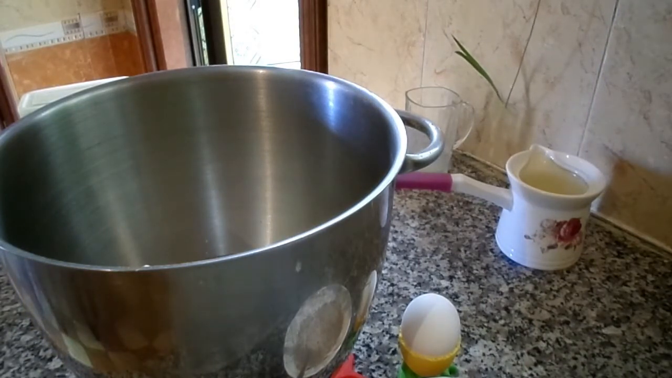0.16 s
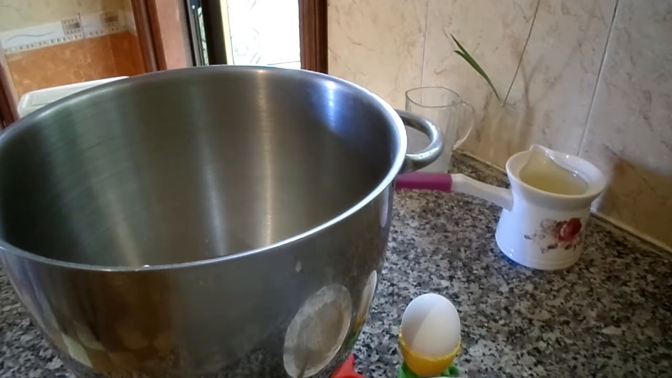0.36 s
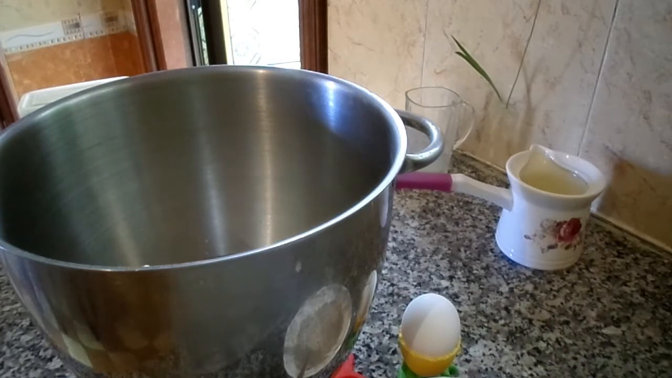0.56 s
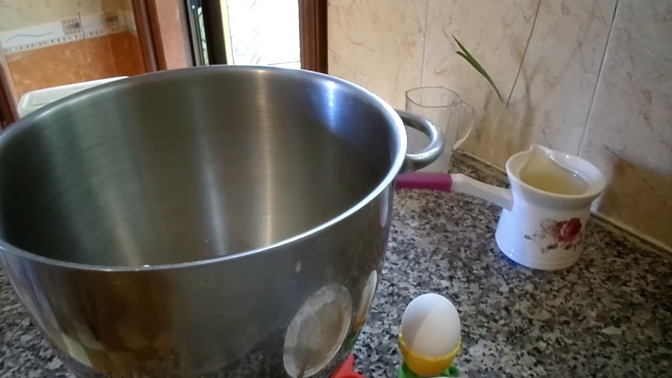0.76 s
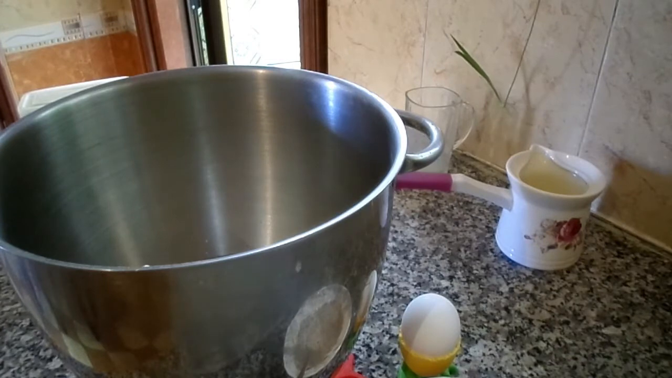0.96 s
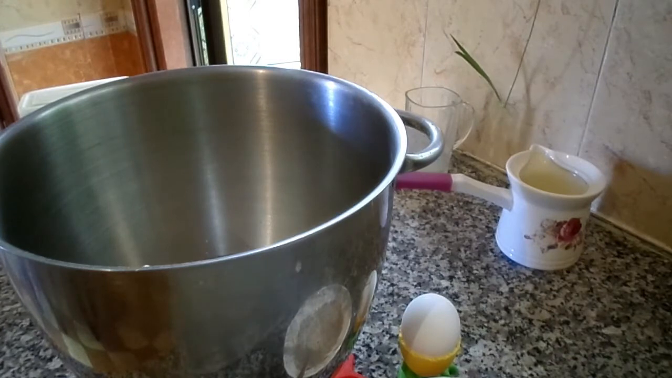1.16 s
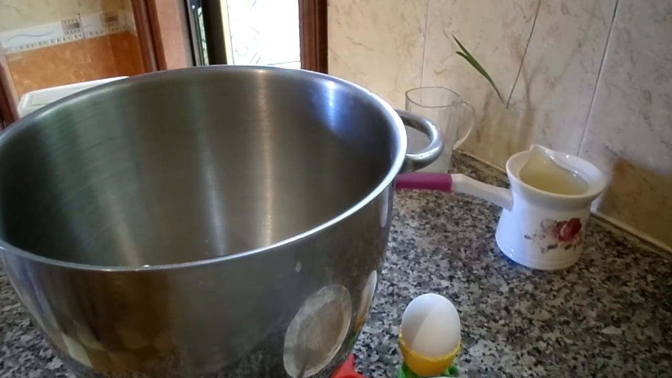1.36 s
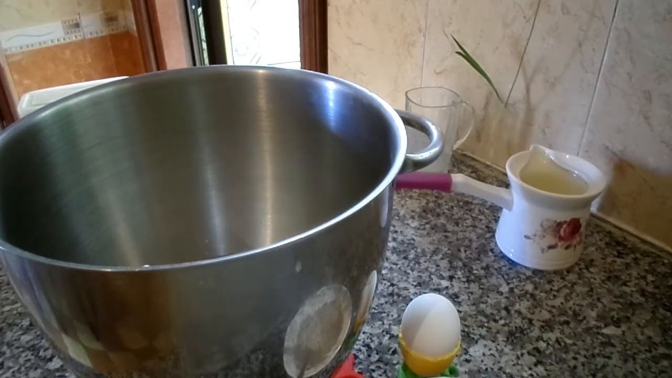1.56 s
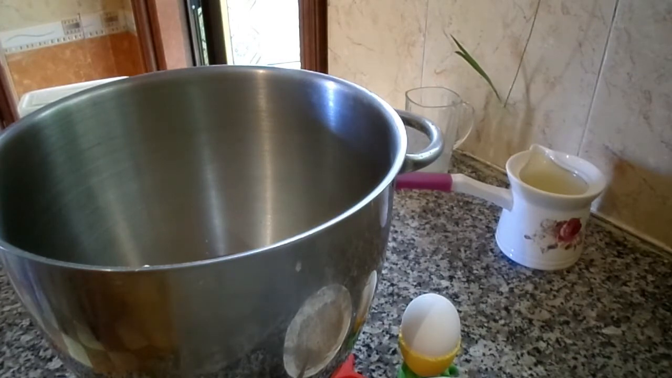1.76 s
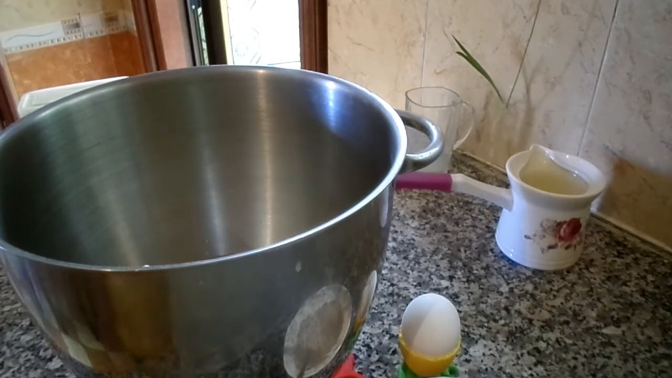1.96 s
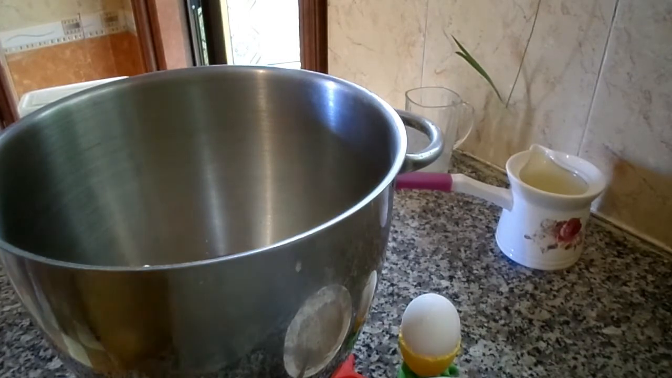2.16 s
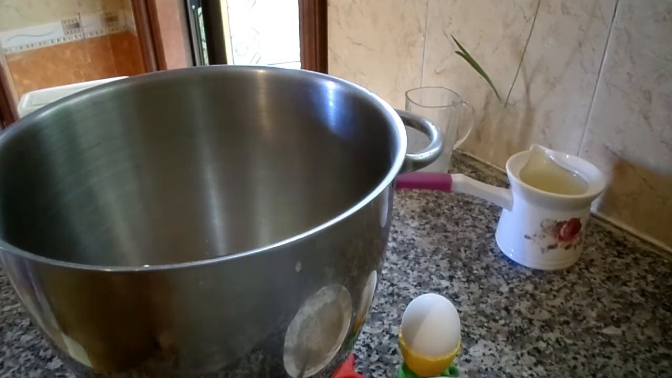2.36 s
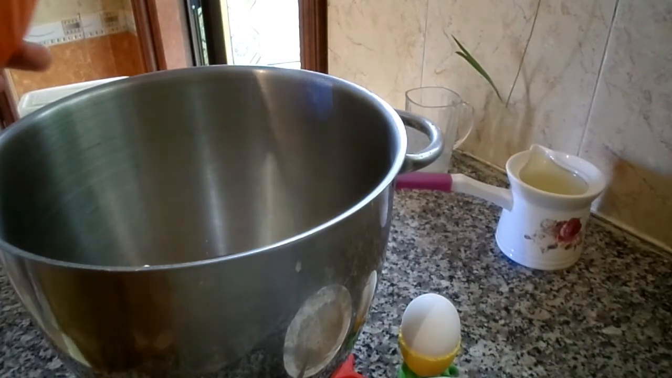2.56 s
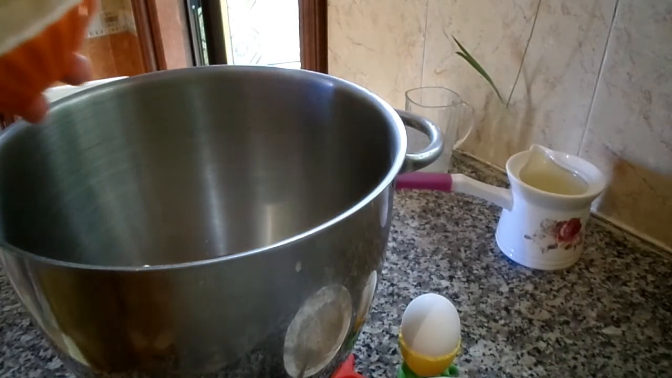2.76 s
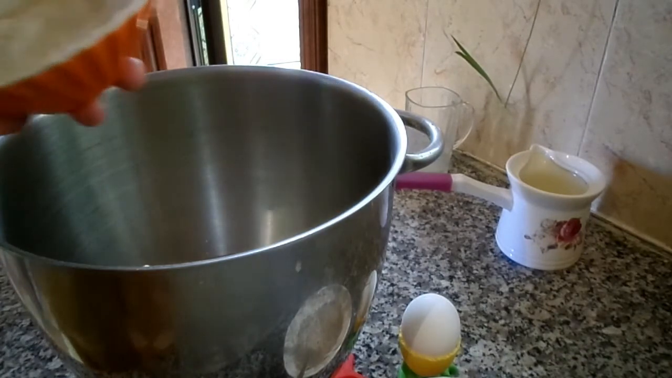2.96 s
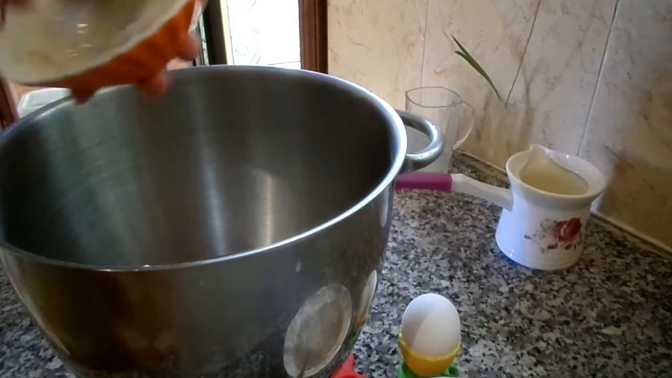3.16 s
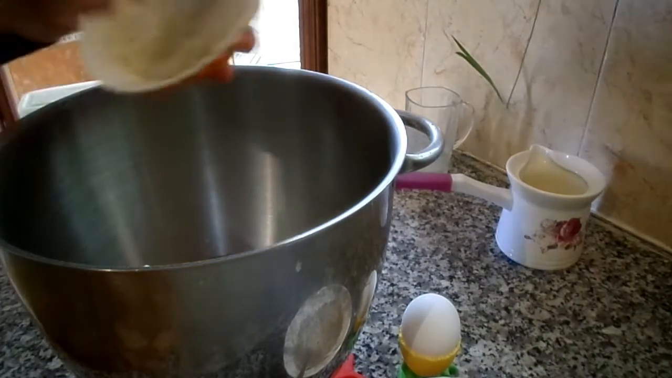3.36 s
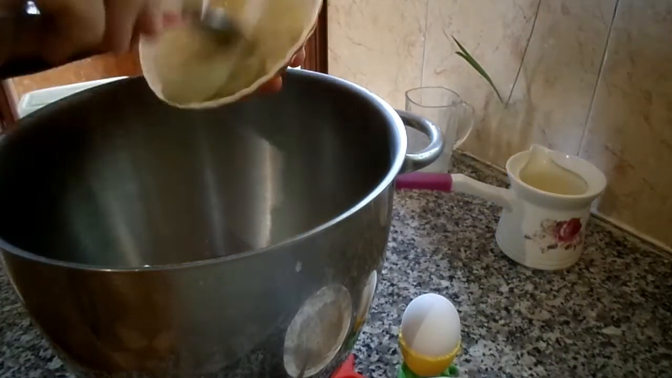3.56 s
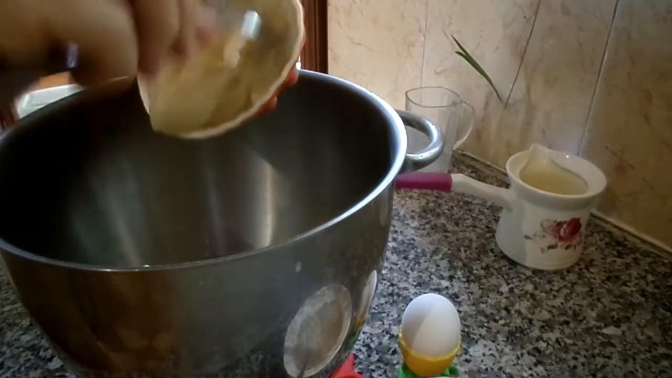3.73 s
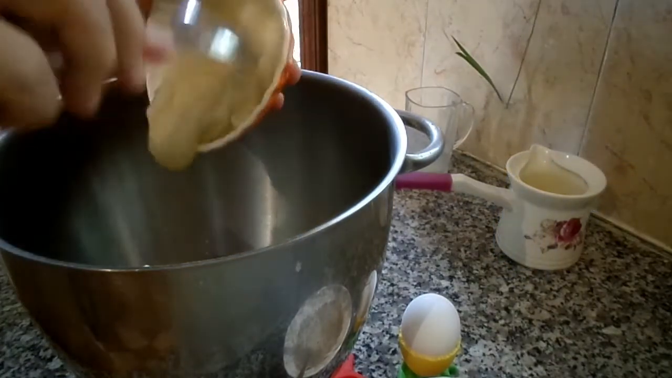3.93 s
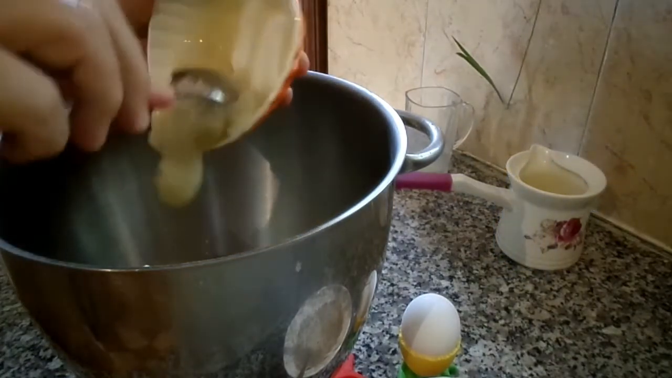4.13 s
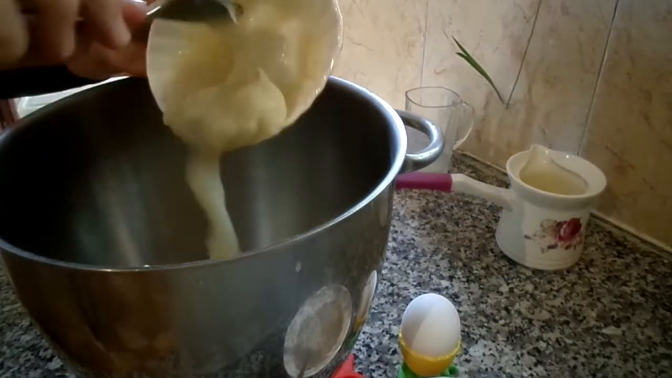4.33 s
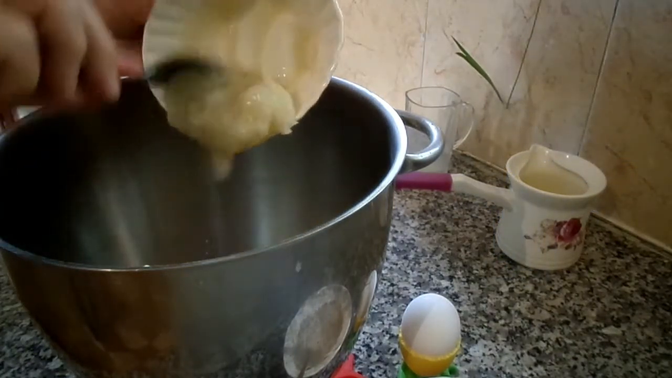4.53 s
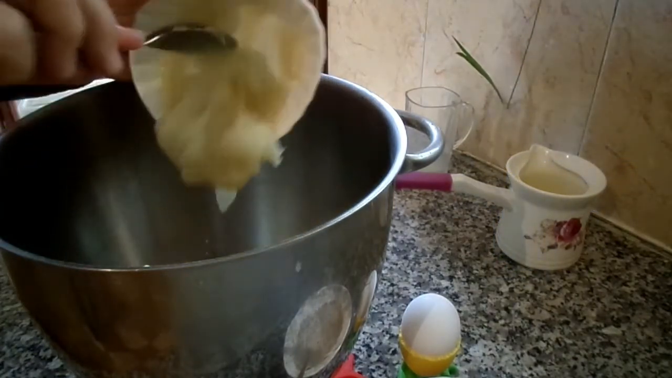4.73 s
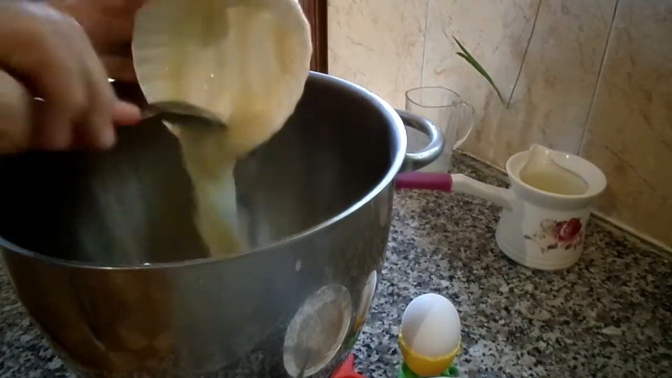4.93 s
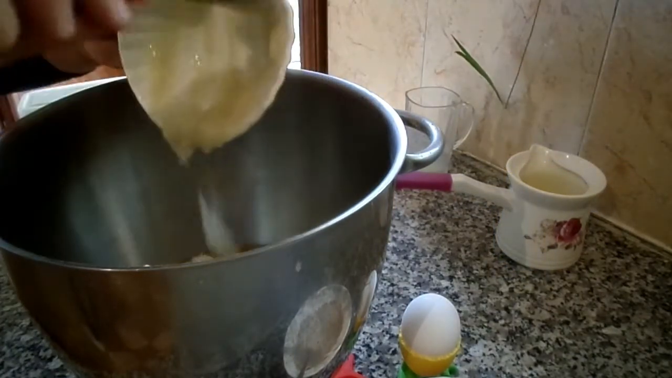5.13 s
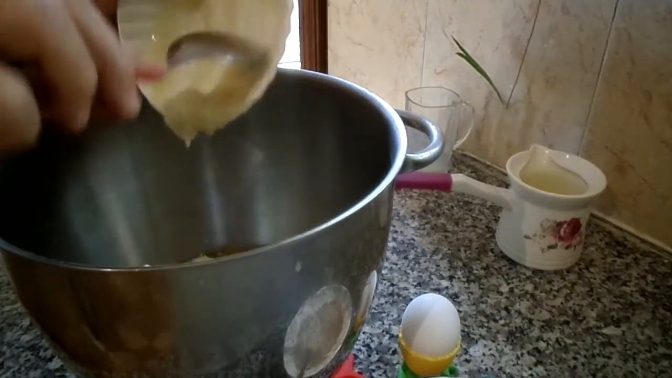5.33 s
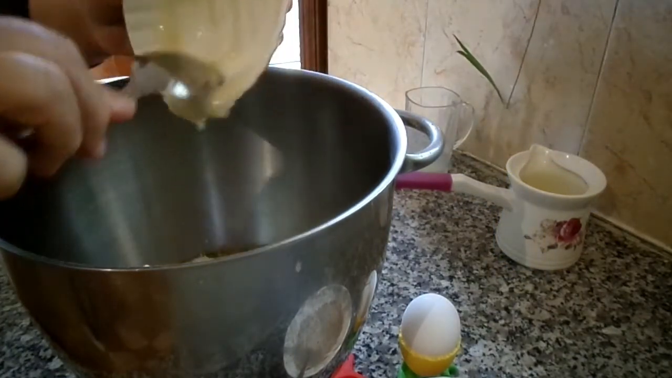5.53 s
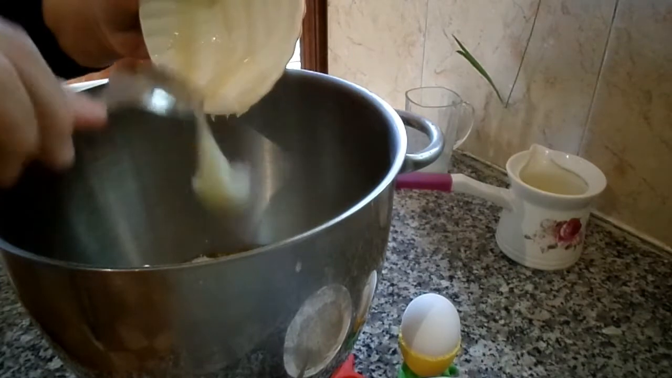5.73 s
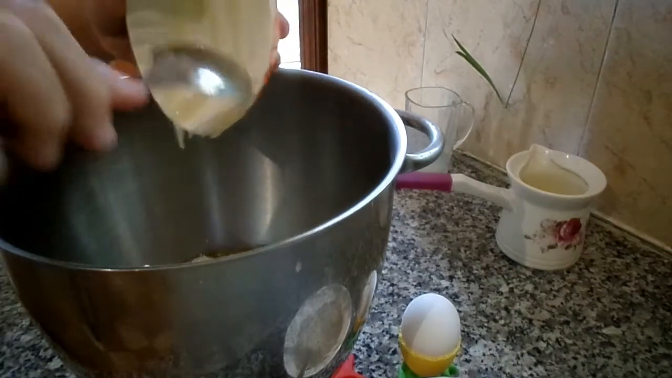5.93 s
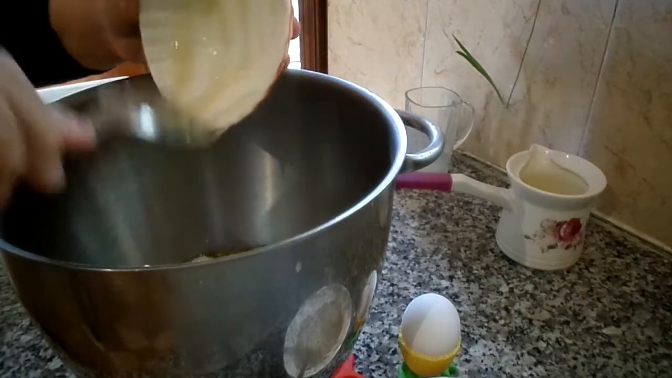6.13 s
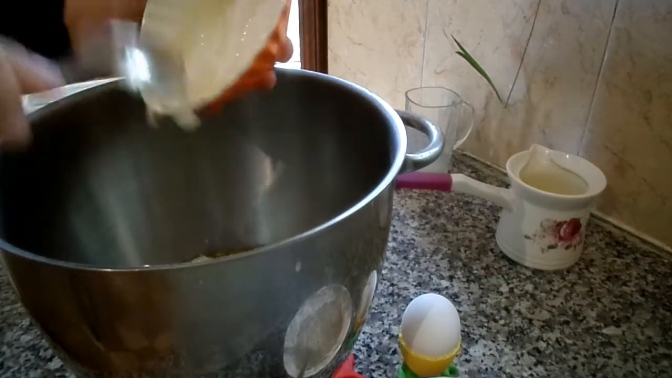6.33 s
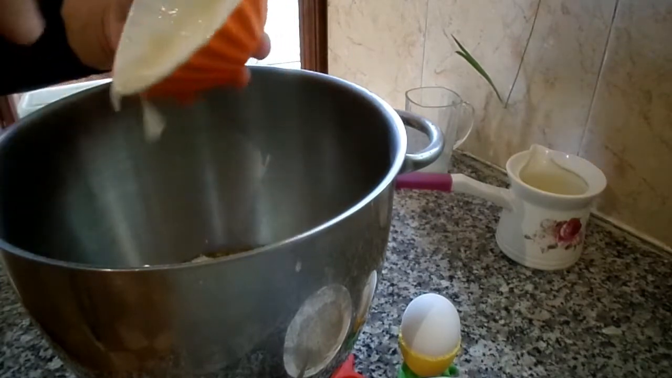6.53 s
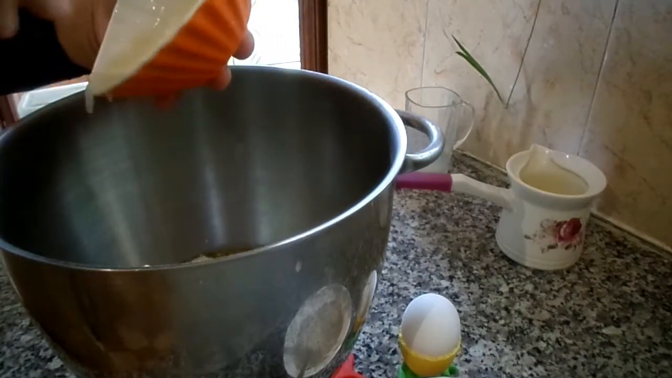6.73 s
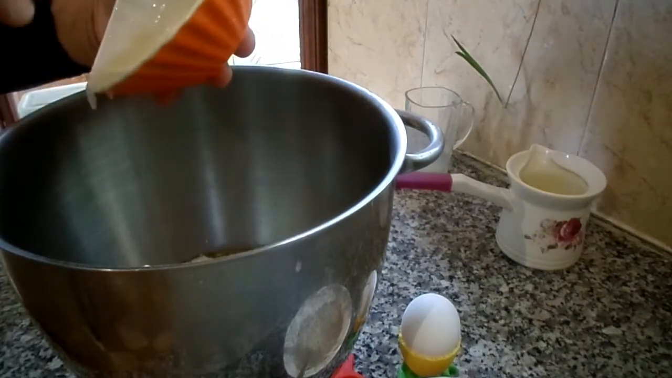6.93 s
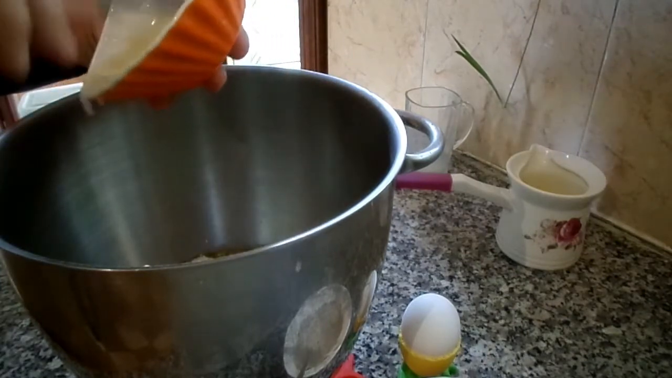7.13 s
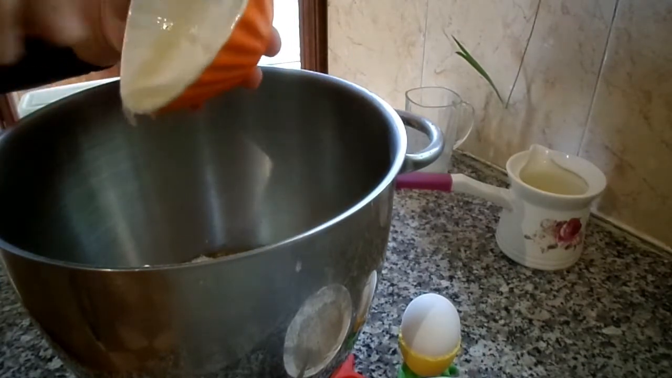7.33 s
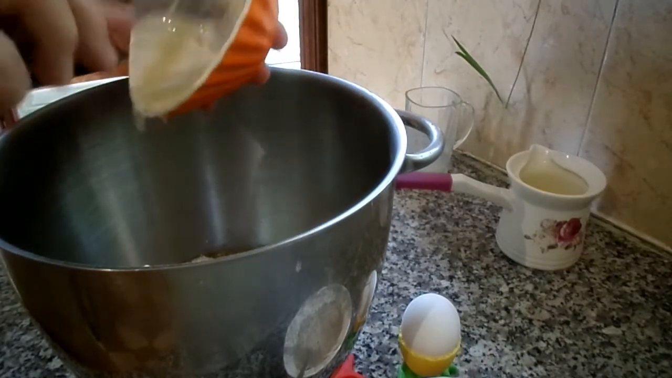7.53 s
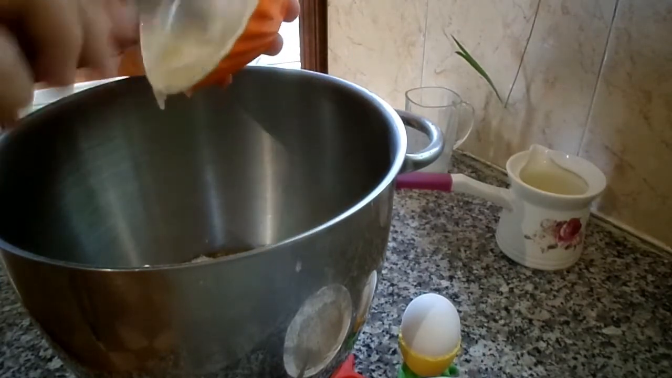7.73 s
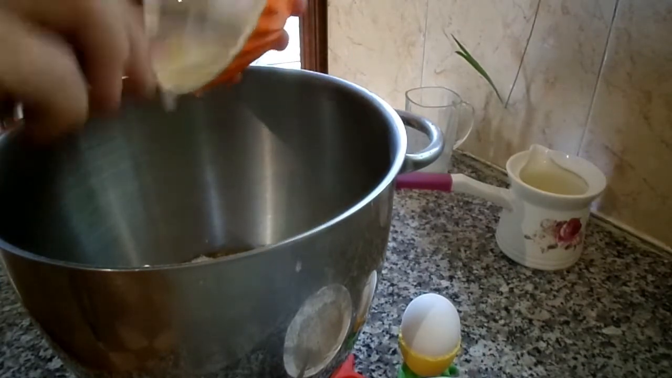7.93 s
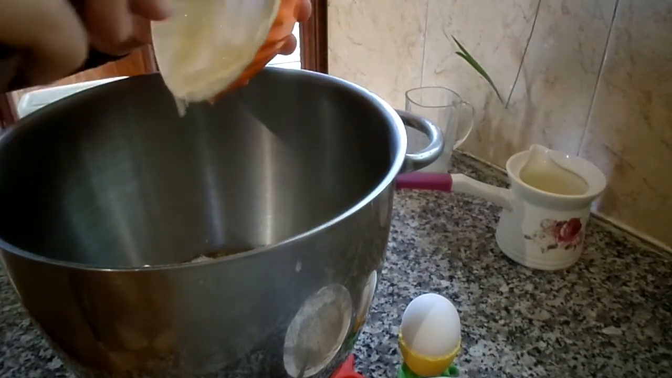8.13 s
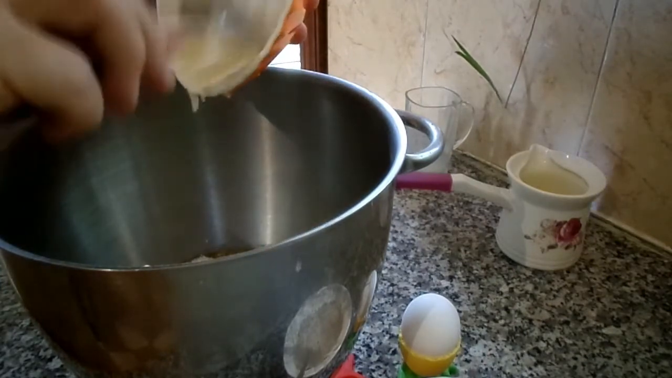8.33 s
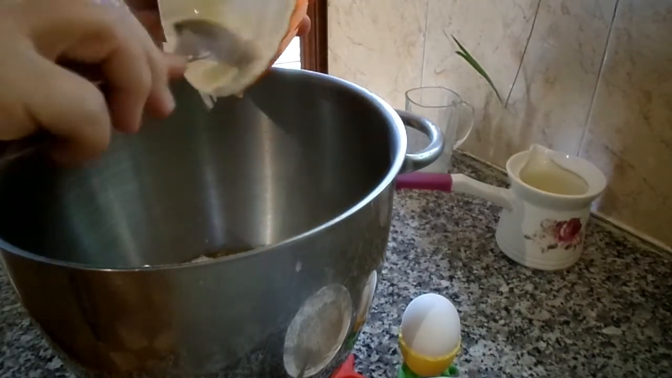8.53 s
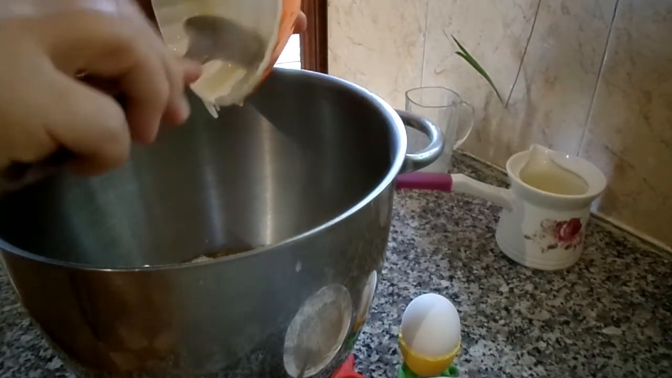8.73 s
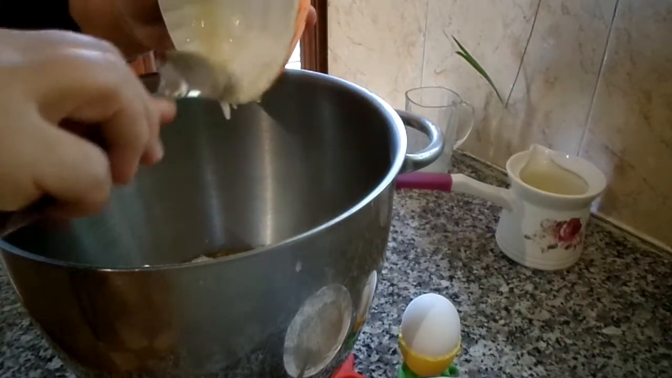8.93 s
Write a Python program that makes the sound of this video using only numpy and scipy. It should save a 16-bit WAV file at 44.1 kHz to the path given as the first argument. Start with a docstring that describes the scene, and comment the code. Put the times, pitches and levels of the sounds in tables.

```python
"""A steel spoon taps and scrapes a small ceramic bowl held over a steel pot in a tiled kitchen.
Each blow is a noise crack, a thud and decaying modes of the hand-damped bowl; drags are filtered random slips.
Noise-fed metal modes make cutlery jingle at the start; dull knocks and hand brushes are shaped noise.
A fridge hums in sines over noise rumble and hiss; this background is lower during most of the clatter.
A decaying noise tail gives the room."""
import sys
import numpy as np
from scipy import signal
from scipy.fft import rfft, irfft
from scipy.io import wavfile
from scipy.ndimage import uniform_filter1d

SR = 44100
rng = np.random.default_rng(int(sys.argv[2]) if len(sys.argv) > 2 else 0)


def file_out(sig):
    """Save sig as 16-bit WAV at sys.argv[1]."""
    # one column per channel
    cols = np.atleast_2d(sig).T
    # limit, then scale
    lim = np.clip(cols, -1, 1)
    pcm = np.round(lim * 32767).astype(np.int16)
    wavfile.write(sys.argv[1], SR, pcm)


N = 400407
TIME_S = np.arange(N) / SR


def undb(db):
    """Amplitude ratio from dB."""
    return 10 ** (np.asarray(db) / 20)


def unit(x):
    """Scales to RMS 1."""
    return x / np.sqrt(np.mean(x ** 2))


def noise(n=N):
    """White Gaussian noise."""
    return rng.standard_normal(n)


def colour(x, points):
    """Shapes a spectrum by (frequency [Hz], gain [dB]) points, linear over log frequency."""
    hz, db = np.transpose(points)
    bin_hz = np.maximum(np.arange(len(x) // 2 + 1) * SR / len(x), 1)
    gain = undb(np.interp(np.log(bin_hz), np.log(hz), db))
    return irfft(rfft(x) * gain, len(x))


def band(x, hz, width_hz):
    """One resonant band."""
    return signal.lfilter(*signal.iirpeak(hz, hz / width_hz, fs=SR), x)


def curve_db(points, **ends):
    """Level [dB] over time, linear between (time [s], level [dB]) points."""
    return np.interp(TIME_S, *np.transpose(points), **ends)


def walk(rate_hz):
    """Random levels joined by straight ramps, one per 1 / rate_hz; spread near 1."""
    step = int(SR / rate_hz)
    held = np.repeat(rng.standard_normal(N // step + 1), step)
    return 1.37 * uniform_filter1d(held, step)[:N]


def fade(t_s, t60_s):
    """Exponential decay, 60 dB in t60_s."""
    return np.exp(-np.log(1000) * t_s / t60_s)


def add(out, start_s, x):
    """Mixes x into out at start_s, cut at the end."""
    i = int(start_s * SR)
    out[i:i + len(x)] += x[:N - i]


def ring(x, hz, t60_s):
    """One decaying mode driven by x: a two-pole resonator."""
    radius, angle = fade(1 / SR, t60_s), 2 * np.pi * hz / SR
    return signal.lfilter([np.sin(angle)], [1, -2 * radius * np.cos(angle), radius * radius], x)


def strokes(rows):
    """Gain of strokes that swell to a peak, then fade at a steady dB rate."""
    out, t = np.zeros(N), TIME_S[:SR // 2]
    swell_depth_db = 15.5  # start of a stroke below its peak
    for start_s, swell_s, peak_db, fade_db_per_s in rows:
        rise_db = swell_depth_db * (1 - t / swell_s)
        fall_db = fade_db_per_s * (t - swell_s)
        add(out, start_s, undb(peak_db - np.maximum(rise_db, fall_db)))
    return out


# level curve of the colliding cutlery: (time [s], level [dB])
JINGLE_LEVEL = [(0, -23), (.006, -27.5), (.026, -28), (.031, -27), (.058, -26), (.08, -30), (.14, -40)]
# cutlery modes: (frequency [Hz], relative level [dB], nominal t60 [s])
CUTLERY_MODES = [(2996, -19.5, .25), (3950, -21, .2), (5280, -19, 0.56), (5470, -25, 0.44),
                 (6090, -16.5, 0.23), (6810, -13.5, 0.32), (7650, -18, 0.31), (8750, -15.5, .2),
                 (10190, -8.5, .4), (10200, -9, 0.3), (10900, -12, .3), (12040, -5, 0.65),
                 (12130, -0.5, 0.13), (12700, -8, 0.28), (13000, -2, 0.16), (13810, -12, .3),
                 (14400, -14, .15), (15110, -11, .16)]
# contact noise spectrum, also of blows and drags: (frequency [Hz], relative gain [dB])
CRACK_SPECTRUM = [(300, -41), (720, -17.5), (1800, -6.5), (4000, -2.5), (6800, -5), (9500, -2), (13000, 2),
                  (16000, -11)]


def jingle():
    """Flickering noise for quick small collisions feeds thin metal modes, each a close pair."""
    level = undb(curve_db(JINGLE_LEVEL, left=-200, right=-200))
    hits = (level * noise() * undb(1.4 * walk(300)))[:SR]
    rung = np.zeros(SR)
    for hz, db, t60_s in CUTLERY_MODES:
        for pair in (1, 1.006):
            rung += undb(db) * ring(hits, hz * pair, 0.57 * t60_s) / np.sqrt(t60_s * SR)
    return np.pad(undb(16.5) * rung + undb(-7.5) * colour(hits, CRACK_SPECTRUM), (0, N - SR))


# fridge hum partials: (frequency [Hz], mean relative level [dB])
HUM_PARTIALS = [(100, -2), (200, -21.5), (300, -13.5)]


def hum():
    """Mains hum of the fridge: sines with slightly wavering levels."""
    out = np.zeros(N)
    for hz, db in HUM_PARTIALS:
        out += undb(db + .5 * walk(11)) * np.sqrt(2) * np.sin(2 * np.pi * hz * TIME_S)
    return out


# low rumble before the background curve: (time [s], level [dB])
RUMBLE_LEVEL = [(0, 4.5), (.6, -9), (.9, -3), (1.5, -9), (1.75, 4), (2.2, 2), (3, -10.5), (4, -2.5),
                (9, -5)]


def rumble():
    """Noise through two low resonances, its level following a curve."""
    low = band(band(noise(), 39.4, 15.0), 42.3, 21.0)
    return undb(curve_db(RUMBLE_LEVEL)) * unit(low)


# hiss spectrum: (frequency [Hz], relative gain [dB])
HISS_SPECTRUM = [(15, -35), (25, 1), (60, -10), (130, -9), (270, -13), (1330, -13.5), (2100, -6.5),
                 (2550, -10.5), (3340, -5.5), (4300, -13.5), (5430, -17), (8300, -16.5), (10900, -11.5),
                 (13500, -16.5), (16000, -36)]


def hiss():
    """Coloured noise with a gently flickering level."""
    level_db = 11  # before the background curve
    return undb(level_db + 0.66 * walk(9)) * unit(colour(noise(), HISS_SPECTRUM))


# common background gain: (time [s], level [dB])
BACKGROUND_LEVEL = [(0, -49), (.6, -50.5), (2.83, -50), (2.93, -56), (3.61, -49.5), (3.72, -56.5),
                    (4.05, -58.5), (4.3, -58), (4.58, -61.5), (5.34, -65.5), (5.81, -57), (5.97, -73),
                    (6.09, -65), (6.24, -67.5), (6.98, -59), (7.51, -61.5), (8.14, -61), (9.05, -58)]


def background():
    """Hum, rumble and hiss rise and sink together on one gain curve."""
    return undb(curve_db(BACKGROUND_LEVEL)) * (hum() + rumble() + hiss())


# dull knocks away from the bowl: (time [s], level [dB], centre [Hz], width [Hz], t60 [s])
KNOCK_HITS = [(.324, -33.5, 1980, 3500., 0.28), (.335, -40, 350., 500., 0.41), (3.054, -39, 352, 161, 0.31),
              (3.06, -47, 860, 400., 0.24), (3.059, -46, 171, 80., 0.25), (3.385, -33, 2070, 500., 0.089),
              (3.405, -37.5, 1850., 400., 0.13)]


def knocks():
    """Decaying noise bursts, each in one broad resonance."""
    out, t = np.zeros(N), TIME_S[:SR // 4]
    for start_s, db, hz, width_hz, t60_s in KNOCK_HITS:
        burst = unit(band(noise(len(t)), hz, width_hz))
        add(out, start_s, undb(db) * fade(t, t60_s) * burst)
    return out


# a hand brushes over something: (start [s], swell [s], peak level [dB], fade [dB/s])
BRUSH_STROKES = [(.595, .022, -42, 170), (2.46, 0.12, -34.5, 110), (2.76, .045, -41, 600),
                 (3.325, .006, -40, 400), (3.39, .016, -36, 600), (3.42, .09, -36.5, 105)]
# friction spectrum: (frequency [Hz], relative gain [dB])
BRUSH_SPECTRUM = [(1000, -18), (3000, -16), (6000, -4.5), (9000, -3.5), (12500, 2.5), (16000, -16)]


def brush():
    """Bright friction noise in smoothed strokes, its level wavering."""
    level = uniform_filter1d(strokes(BRUSH_STROKES), 400) * undb(2.6 * walk(30.03))
    return level * unit(colour(noise(), BRUSH_SPECTRUM))


# blows: (time [s], level [dB], then relative levels of rim sway [dB], spoon bowl ring [dB],
# high ring [dB], top rings [dB])
BLOW_HITS = [(2.846, 8.5, -22, -28, -6, -10), (2.964, -25, -22, -17, -21, -9),
             (3.274, -7.5, -23, -37, -14, -0.5), (3.309, -16, -22, -11, -17, -18),
             (3.65, -3.5, -23, -37, -23, -1), (3.675, 2, -27.5, -19, -17, -9.5),
             (3.754, 7, -27.5, -24, -16, -30), (3.774, -5, -23, -34, -12, -19),
             (3.965, -15.5, -38, -36, -8, -6), (3.982, -19.5, -17, -21, -3, -2),
             (3.988, -6.5, -24.5, -39, -9.5, 0.5), (4.069, -27, -22, -31, -20, -5),
             (4.359, -2.5, -33, -25, -40, -14), (4.364, -1, -22.5, -11.5, -33, -9),
             (4.41, -14, -28, -24, -24, -13), (4.427, -7.5, -23.5, -39, -24, -24),
             (4.499, -31, -9, 4, -11, -9), (4.526, 1.5, -43, -29, -24, -20),
             (4.716, -1, -25.5, -20, -27, -19), (4.781, 1.5, -22.5, -14, -20, -23),
             (4.82, -15, -30, -23, -20, -19), (4.854, -19, -31, -24, -15, -20),
             (4.896, -30, -27, -21, -24, -15), (5.07, -5.5, -41, -30, -15, 1.5),
             (5.212, -14.5, -17, -7.5, -9.5, -22), (5.336, -21.5, -30, -3, -7, -17),
             (5.358, -2.5, -36, -10, -11, -15), (5.394, -7.5, -39, -28, -13.5, -19),
             (5.426, -10.5, -23, -9, -15, -20), (5.6, -25.5, -11, -24, -10.5, -27),
             (5.806, -12.5, -45, -20, -40, 1), (5.907, -5.5, -20.5, -47, -10, -9),
             (5.927, -8, -18, -26, -5, -21), (5.963, -3.5, -31, -41, -0.5, -24),
             (5.989, -4, -22, -43, -5, -16), (6.013, -1, -22.5, -41, -7, -5), (6.22, -3, -16, -40, -5, -14),
             (6.618, -13, -22, -37.5, -11.5, 0), (6.646, -13.5, -23.5, -37, -22, -6),
             (6.987, -8, -28, -44, -24, -1), (7.015, -8.5, -32, -18, -18, -16),
             (7.06, -7.5, -27, -18, -6, -20), (7.075, -11, -19, -9.5, -22, -17),
             (7.09, -8, -21.5, -8, -11, -17), (7.11, -9.5, -20.5, -9, -31, -21),
             (7.137, -14, -14.5, -20, -24, -23), (7.327, -7, -27.5, -31, -17, 1),
             (7.419, -7, -29, -27, -22, -4), (7.546, -16.5, -19, -4.5, -21, -16),
             (7.56, -1, -22, -9, -20, -27), (7.596, -4.5, -26, -24, -17, -24),
             (7.619, -13, -28, -23, -10, -22), (7.806, 0.5, -27, -27, -8.5, -7),
             (7.924, -30, -13, 2.5, -24, -17), (8.132, -8, -26.5, -22, -6.5, -2),
             (8.221, 1.5, -16.5, -13, -6.5, -9), (8.371, -5.5, -24.5, -17, -14.5, -1),
             (8.45, 0, -15.5, -7.5, -11.5, -36), (8.62, -11, -27, -21, -19, -1),
             (8.662, -8.5, -12, -34, -10, -14), (8.69, -25, -20, 5, -25, -23),
             (8.71, -22, -14, 6.5, -23, -23), (8.731, -29, -22, 1, -27, -25),
             (8.763, -30, -7, 3.5, -31, -24), (8.955, -3, -31.5, -27, -6.5, -17)]
# modes: (frequency [Hz], relative level [dB], nominal t60 [s], group [floor: 0 rim, 1 spoon bowl,
# 2 wall, 3 upper wall, 4 high, 5 top])
BOWL_MODES = [(2180, -7.5, 0.022, 0.33), (2415, 0, 0.029, 1), (2590, -4, 0.026, 0.5), (3030, -8, 0.35, 2.5),
              (3085, -9, 0.47, 2.5), (3124, 0, 0.084, 2.5), (4766, -2.5, 0.014, 3.3), (5208, 0, 0.038, 3),
              (5356, 0.5, 0.026, 3), (7910, -1.5, 0.035, 3.5), (8050, -3, 0.027, 4), (8170, 1, 0.026, 3.6),
              (11470, -3, 0.021, 4.5), (11830, 0.5, 0.011, 5), (12300, -2.5, 0.0078, 4.1),
              (12560, -5.5, 0.012, 5.4), (12920, -14, 0.0069, 5.6), (14900, -11, 0.031, 5)]
# paste and grip load the bowl: (time [s], rim sway [Hz], ring time factor [1],
# thud offset [dB], wall ring offset [dB])
BOWL_LOAD = [(2.85, 1502, 0.75, -5.5, -10.5), (3.27, 1368, 1.05, -12, -10), (3.65, 1410, 0.99, -5, -20),
             (3.675, 1155, .95, -2, -13.5), (4.0, 1100, 1.08, 1, -16), (4.72, 1040, 0.78, 1.5, -19),
             (4.78, 1408, 0.68, 0, -23), (5.07, 1230, 0.94, 1, -17), (5.209, 1027, 1, 0, -13),
             (5.36, 1500, 0.94, -18, -16), (5.6, 1342, 1., -16, -15), (5.91, 1356, 1.7, -24, -9),
             (6.22, 1387, 1.17, -13.5, -11.5), (7.06, 1335, 1.14, -0.5, -4), (7.8, 1300, 1.2, -8, -15),
             (8.45, 1376, 1.25, -14, -9.5), (8.95, 1390, 1.07, -12, -12)]
# coupling between group levels, dB per dB
THUD_PER_RIM, THUD_PER_SPOON, WALL_PER_RIM, UPPER_PER_HIGH = 0.72, 0.36, 0.73, .6
UPPER_DB = -8.5
SWAY_T60_S, SWAY_SPLIT = 0.069, 0.023  # nominal t60; rim sways as a pair at 1 +- split
WALL_AT_HZ, WALL_TOP_HZ, WALL_POWER = 1335, 1393, .65  # wall pitch follows sway pitch, up to a limit
FLUTTER_DB, FLUTTER_HZ, FLUTTER_ONSET_S = 5, 110, .03  # shifting grip and paste


def blows():
    """Crack, thud and fluttering modes; each blow draws random mode pitch, share and phase."""
    out, t = np.zeros(N), TIME_S[:SR // 2]
    hz, db, t60_s, group = np.array(BOWL_MODES).T[:, :, None]
    group = group.astype(int)
    chance = rng.standard_normal((len(BLOW_HITS), 3, len(hz), 1))  # no two blows ring alike
    crack = unit(colour(noise(), CRACK_SPECTRUM))
    thud = unit(band(noise(), 990.0, 920.0))
    grip = np.array([undb(FLUTTER_DB * walk(FLUTTER_HZ)) for _ in range(6)])  # one per group
    load_at_s, *load = np.transpose(BOWL_LOAD)
    for blow, (detune, share, turn) in zip(BLOW_HITS, chance):
        start_s, level_db, rim_db, spoon_db, high_db, top_db = blow
        sway_hz, hold, thud_db, wall_db = (np.interp(start_s, load_at_s, c) for c in load)
        hold = np.clip(hold, .2, 4)
        thud_db = thud_db + THUD_PER_RIM * rim_db + THUD_PER_SPOON * spoon_db
        wall_db = wall_db + WALL_PER_RIM * rim_db
        upper_db = UPPER_DB + UPPER_PER_HIGH * high_db
        group_db = np.array([rim_db, spoon_db, wall_db, upper_db, high_db, top_db])
        i = int(start_s * SR) - len(t)
        part = slice(i, i + len(t))
        flutter = grip[:, part] ** np.minimum(t / FLUTTER_ONSET_S, 1)

        gain = undb(db + group_db[group] + 2.3 * share - 2.5)
        wall_shift = min(sway_hz, WALL_TOP_HZ) / WALL_AT_HZ
        load_hz = hz * wall_shift ** (WALL_POWER * (group == 2))
        mode_hz = load_hz + 2.53 * detune / t60_s  # more damped modes stray further
        waves = np.sin(2 * np.pi * mode_hz * t + 0.54 * turn)
        modes = (gain * flutter[group[:, 0]] * fade(t, t60_s * hold) * waves).sum(0)

        beat = np.cos(2 * np.pi * SWAY_SPLIT * sway_hz * t)
        sway = flutter[0] * fade(t, SWAY_T60_S * hold) * np.sin(2 * np.pi * sway_hz * t) * beat

        contact = undb(-9) * fade(t, 0.017 * hold) * crack[part]
        contact += undb(thud_db - 4.5) * fade(t, 0.034) * thud[part]
        attack = np.minimum(t / 0.00027, 1)
        hit = undb(level_db) * (modes + undb(rim_db) * sway + contact) * attack
        add(out, start_s + .0008, hit)
    return out


# spoon drags over the glaze: (start [s], swell [s], peak drive [dB], fade [dB/s])
DRAG_STROKES = [(3.753, .004, -20.5, 250), (4.37, .05, -42, 59), (4.788, .004, -32.5, 157),
                (5.213, .004, -43.5, 200), (5.28, 0.069, -31.5, 108), (5.58, 0.016, -42, 250),
                (5.908, .004, -30, 450), (5.95, 0.078, -33, 350), (7.06, .065, -16.5, 480),
                (7.53, 0.026, -22, 168), (8.223, 0.0036, -15, 383), (8.62, 0.069, -30, 300)]
# resonances a drag stirs: (frequency [Hz], width [Hz], relative level [dB])
SQUEAK_BANDS = [(1380, 130, -8), (2340, 430, -2.5), (2700, 180, -6.5), (3054, 82, 1.5), (5220, 240, -8.5),
                (8150, 420, -9.5)]


def drag():
    """Dense uneven slips crackle and squeak in the damped bowl."""
    slips_per_s = 1500
    slips = (rng.random(N) < slips_per_s / SR) * rng.uniform(-0.99, 1, N) ** 3
    level = uniform_filter1d(strokes(DRAG_STROKES), 200) * undb(3.4 * np.tanh(walk(90)))
    slips = level * unit(slips)
    squeak = sum(undb(db) * band(slips, hz, width_hz) for hz, width_hz, db in SQUEAK_BANDS)
    return undb(7.5) * squeak + undb(-5.0) * colour(slips, CRACK_SPECTRUM)


# room decay: (frequency [Hz], t60 [s])
ROOM_DECAY = [(300, 0.7), (1500, 0.72), (5000, 0.54), (15000, 0.21)]


def room(x):
    """Tiled walls: a dense noise tail, full after 1.4 ms, that loses its treble first."""
    level_db = -10
    t, (at_hz, t60_s) = TIME_S[:SR], np.transpose(ROOM_DECAY)
    tail = np.zeros(SR)
    for hz in 250 * 2 ** np.arange(0, 6.1, .5):
        decay = fade(t, np.interp(np.log(hz), np.log(at_hz), t60_s))
        tail += np.sqrt(hz) * unit(band(noise(SR), hz, hz / 2)) * decay
    tail *= np.clip(t / 0.0011 - .3, 0, 1)
    return undb(level_db) * signal.fftconvolve(x, tail / np.sqrt(np.sum(tail ** 2)))[:N]


def scene():
    """Bowl, cutlery and knocks excite the room; brushes and background stay dry."""
    near = jingle() + knocks() + blows() + drag()
    return (near + room(near) + brush() + background())[None]


def record(dry):
    """Peaks beyond 0.98 clip; a low-pass cuts above 16.3 kHz."""
    low_pass = signal.ellip(8, .2, 60, 16300, fs=SR, output="sos")
    return signal.sosfilt(low_pass, np.clip(dry, -.98, .98))


dry = scene()
out = record(dry)
file_out(out)
```